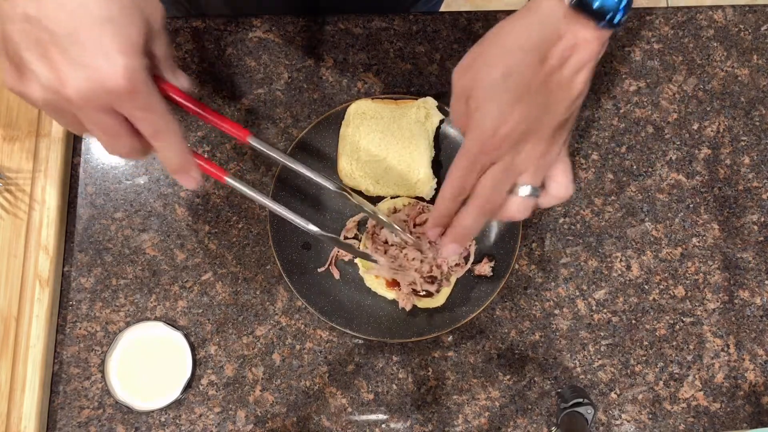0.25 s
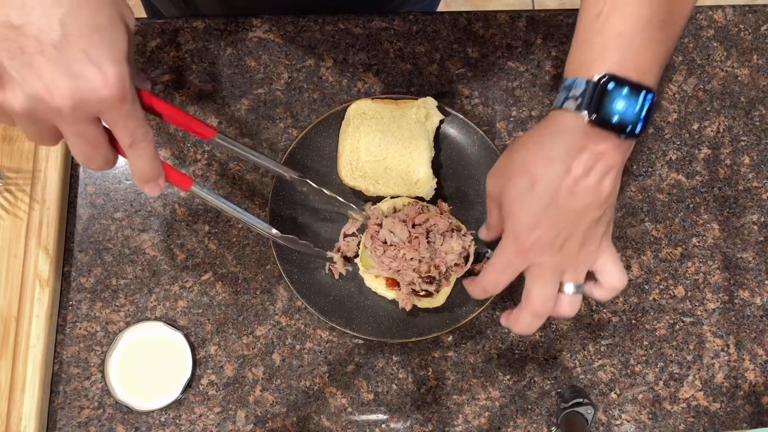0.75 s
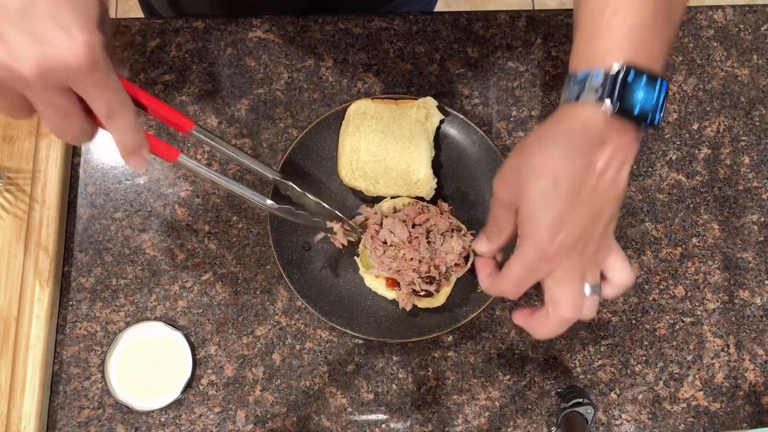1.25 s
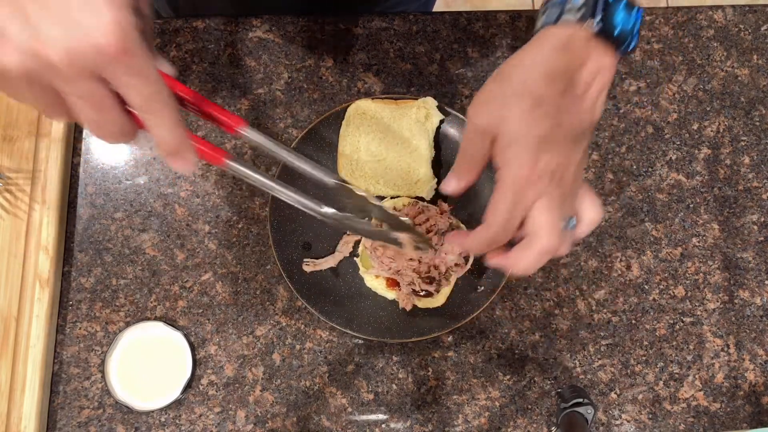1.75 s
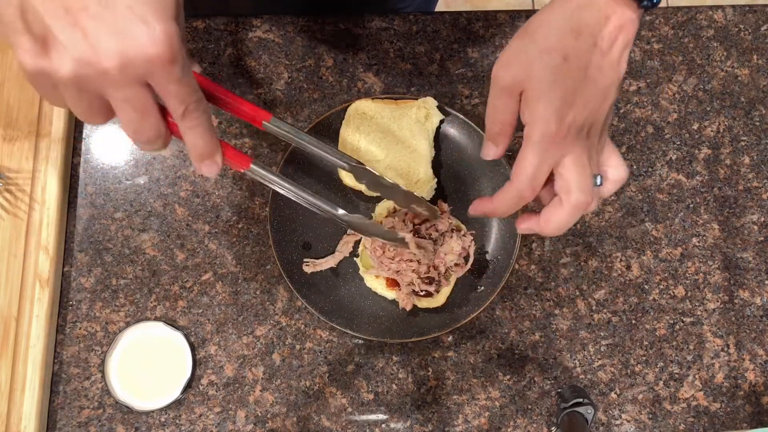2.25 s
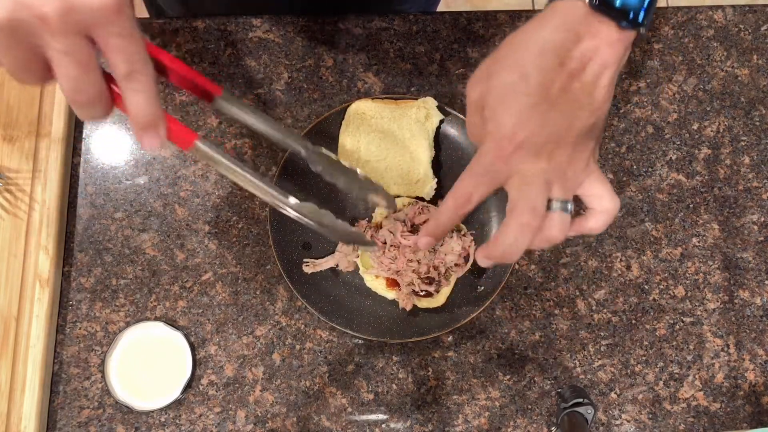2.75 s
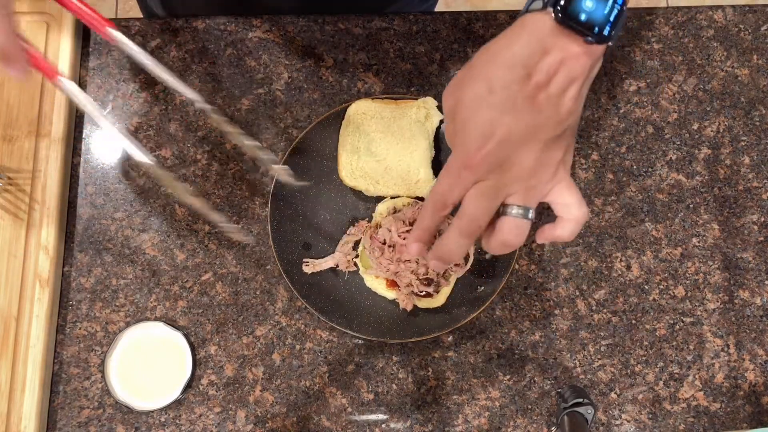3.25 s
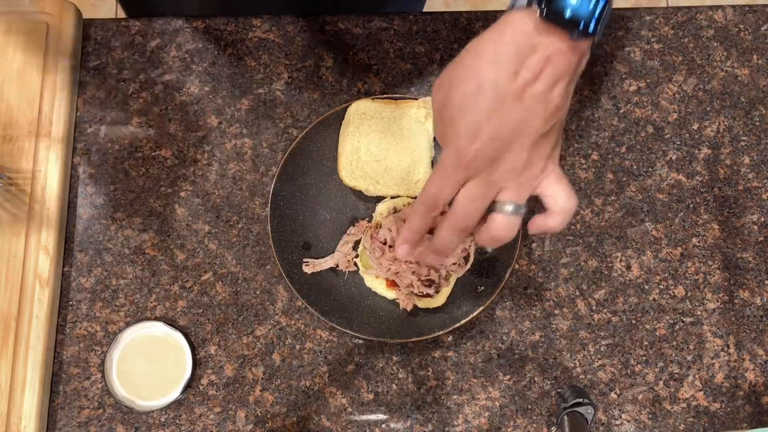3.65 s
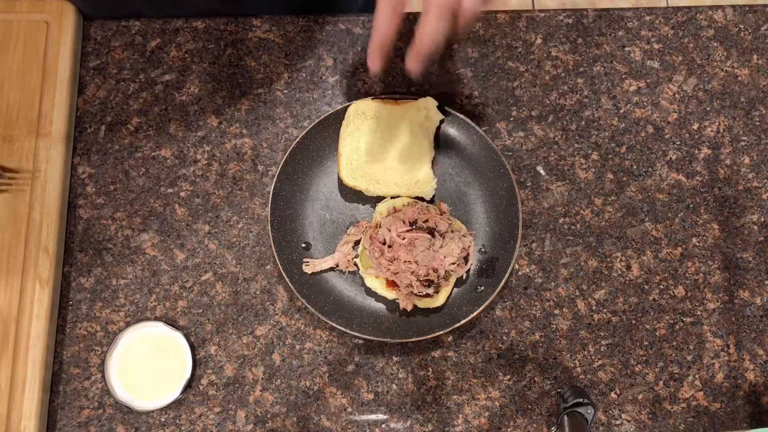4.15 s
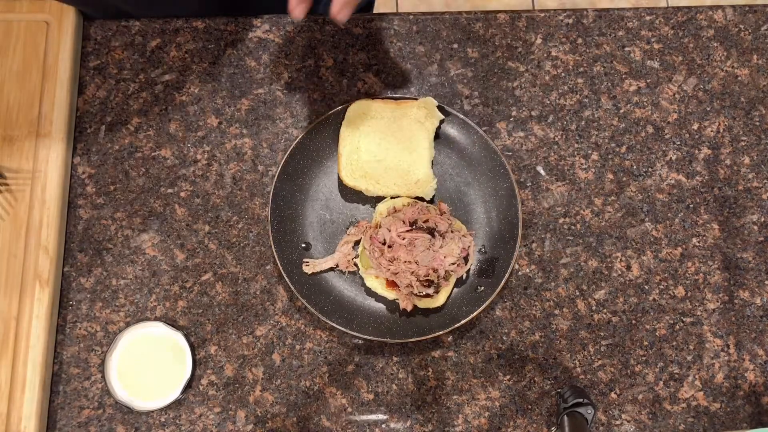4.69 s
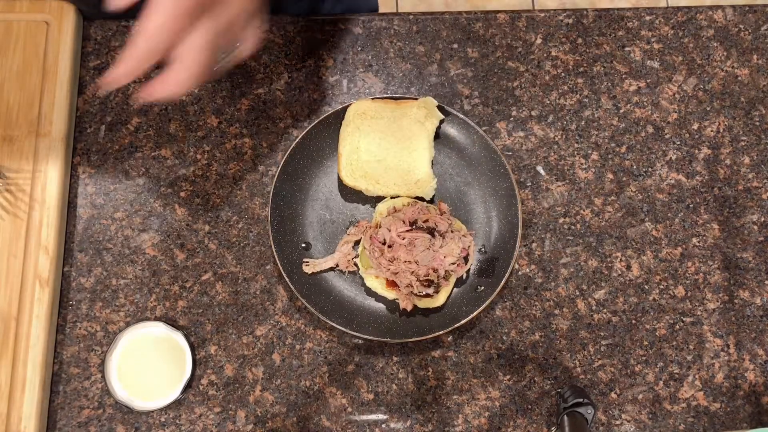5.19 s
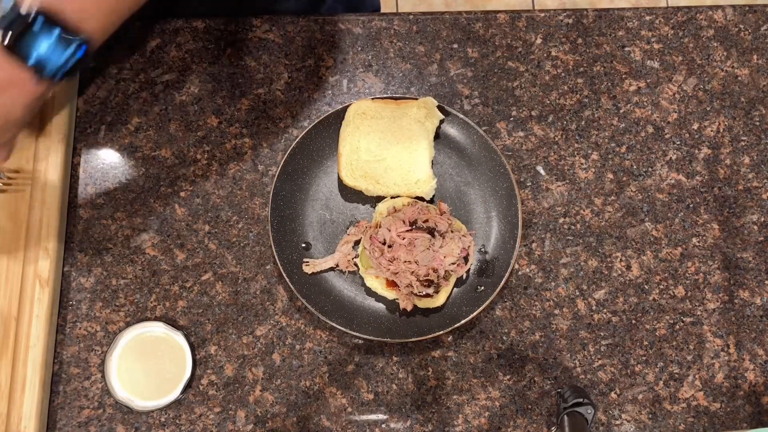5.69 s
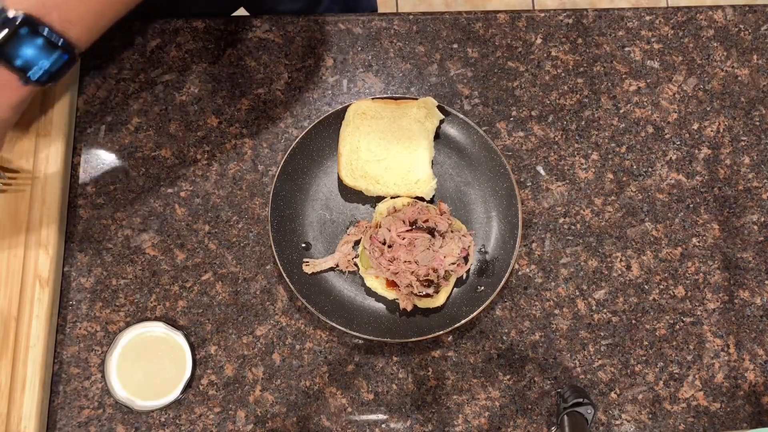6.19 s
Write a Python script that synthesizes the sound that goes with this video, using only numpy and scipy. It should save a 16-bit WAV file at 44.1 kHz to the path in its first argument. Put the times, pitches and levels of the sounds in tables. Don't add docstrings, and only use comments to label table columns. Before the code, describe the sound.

Over a faint fridge hum, tongs pick softly at moist food, then drop with a hard ringing clatter before a run of sharp cutlery clacks.

```python
import sys
import numpy as np
from scipy import signal
from scipy.fft import rfft, irfft, next_fast_len
from scipy.io import wavfile
from scipy.ndimage import uniform_filter1d

SR = 44100
rng = np.random.default_rng(int(sys.argv[2]) if len(sys.argv) > 2 else 0)


def ratio(d):
    e = np.asarray(d, float) / 20
    return 10 ** e


def store_pcm(level_fs):
    pcm = np.round(np.clip(level_fs, -1, 1) * 32767).astype(np.int16)
    wavfile.write(sys.argv[1], SR, np.atleast_2d(pcm).T)


N = 283563

# (time [s], body peak [dB], crack [dB re body], room [dB], far-wall echo [dB])
BLOWS = [
    (4.2450, 2, -6.5, -15, -13),
    (4.512, 7, -9.5, -6.5, -28.5),
    (5.667, -3, -8, -16, -15),
    (5.8679, 3, -7.5, -15.5, -12),
    (6.044, 1, -10, -13.5, -9.5),
    (6.1871, -1, -17, -10, -8),
    (6.3945, -18, -12, -10, -25),
    (2.0445, -23, -11, -5, -20),
]
# (frequency [Hz], width [Hz], level [dB])
TONGS_TIP = [(230, 58, -13), (288, 76, 2), (520, 50, -5.5), (675, 150, 3.5), (1008, 350, 1.5),
             (1375, 170, 2), (1824, 260, -5), (2420, 300, -2), (3166, 445, -11.5), (4500, 500, -12.5),
             (5500, 500, -17.5), (6760, 500, -22.5), (10800, 600, -30), (12600, 500, -28.5)]
TONGS_FALL = [(309, 39, -6.5), (594, 125, -1.5), (910, 250, -6), (1494, 750, -4), (1950, 237, 3),
              (2480, 260, -10.5), (3240, 160, -2), (4280, 500, -16.5), (5800, 320, -10),
              (11900, 700, -37.5), (14700, 500, -38)]
KNOCK_1 = [(1800, 130, 1), (2760, 280, -7.5), (3680, 98, -14.5), (4320, 125, -0.5), (7120, 150, -19),
           (12800, 130, -25), (13700, 260, -31), (14600, 160, -33)]
KNOCK_2 = [(1153, 250, 3), (1846, 180, 10.5), (2820, 150, 7.5), (3840, 48, -3), (4310, 120, 7.5),
           (6100, 110, -10), (6860, 290, -4.5), (7900, 98, -9), (8770, 91, -24), (10500, 110, -24),
           (14800, 130, -24)]
KNOCK_3 = [(1818, 97, 3), (2590, 250, -4.5), (3235, 100, -8.5), (4050, 90, -6), (4650, 160, -3),
           (5670, 85, -23), (7080, 170, -15), (8080, 140, -14.5), (11500, 280, -25), (12700, 260, -25),
           (14000, 130, -16)]
KNOCK_4 = [(1723, 150, -5.5), (2350, 250, -12.5), (2904, 240, -7.5), (3960, 145, -0.5), (5150, 100, -28),
           (5900, 150, -10), (6680, 57, 5.5), (9000, 200, -17), (9900, 200, -30), (11100, 160, -15),
           (13500, 400, -19), (14700, 200, -20.5)]
LAST_TAP = [(2130, 330, 2), (2620, 200, 2), (3860, 270, 0), (4500, 210, -2), (6050, 250, -9),
            (6620, 230, -5), (7570, 220, -15), (8800, 280, -14), (10800, 600, -20), (12600, 300, -20)]
FAR_CLACK = [(1650, 200, 0), (2050, 250, -3), (2600, 300, -5), (3200, 400, -4), (3700, 400, -3),
             (4250, 400, -6)]
TONGS_CRACK_HZ, CUTLERY_CRACK_HZ, CRACK_ROOM_DB = 2600, 4600, 6.5
ECHO_S = .0295

# (frequency [Hz], level [dB], t60 [s])
KNOCK_1_RING = [(1061, -6, .15), (1507, -8, .16), (1690, -5, .2), (1820, -7, .35), (2589, 0, .3),
                (3585, -5, .4), (4253, -10, .2), (4640, -10, .35), (5303, -11, .16), (6019, -17, .3),
                (7101, -20, .15), (7827, -23, .2), (8172, -26, .25), (8850, -25, .2)]
KNOCK_2_RING = [(937, -14, .3), (1114, -5, .12), (1529, -10, .25), (1690, -9, .35), (1814, -3, .22),
                (2590, -6, .3), (2708, -10, .25), (3338, -13, .17), (3849, -9, .16), (4242, -14, .25),
                (4716, -14, .3), (6002, -22, .35), (7246, -20, .14), (7983, -25, .25)]
KNOCK_3_RING = [(937, -4, .1), (1497, -13, .4), (1800, -6, .3), (1900, -2, .27), (2503, -10, .4),
                (3338, -8, .17), (4247, -13, .28), (4678, -6, .26), (4743, -9, .3), (2805, -14, .15),
                (5114, -16, .22), (5609, -21, .3), (7041, -16, .05), (8495, -26, .2)]
SPOON_RING = [(1770, -5, .2), (1534, -18, .4), (3000, -15, .2), (3990, -15, .3), (5329, -24, .1),
              (5992, -18, .13), (6659, 0, .11), (6648, -21, 1.1), (8732, -30, .3), (11380, -13, .26)]
LAST_TAP_RING = [(1800, -4.5, 0.17), (2800, -4, 0.054), (3850, -3.5, 0.083), (4530, -7, 0.1),
                 (6630, -3, .05), (8700, -16, .04)]
TONGS_FALL_RING = [(522, -2, .4), (615, -5, .35), (714, -4.5, .4), (800, -6, .4), (883, -3, .45),
                   (1357, -2.5, .13), (1830, -4, 0.55), (2008, -4.5, .6), (1905, -7, .5), (2579, -7, 0.45),
                   (2750, -10, .4), (3268, -9, .3), (4253, -15, .35)]
TONGS_TIP_RING = [(614, 0, 0.23), (727, -8, 0.74), (1287, -20, 5.0), (1717, -17, 5.0), (1809, -16, 3.9),
                  (2137, -12, 1.0), (2229, -11, 0.52), (2541, -17, 1.1), (3343, -14, 0.42),
                  (3521, -22, 0.84), (4317, -14, 0.23), (4990, -33, 1.4), (5281, -21, 0.4),
                  (5949, -35, 5.0)]
# (time [s], peak [dB])
RING_HITS = [
    (5.668, -21.5),
    (5.868, -20),
    (6.043, -22),
    (6.188, -25),
    (6.394, -31),
    (4.513, -17.5),
    (4.246, -20),
]
BEAT_DEPTH, BEAT_HZ = .35, 30

# (frequency [Hz], level [dB], t60 [s])
PLATE = [(1410, -20, .05), (1879, 0, .075), (2148, 0, .06), (3106, -18, .5), (3450, -12, .025),
         (4160, -10, .09), (5286, -18, .12), (6546, -18, .1), (9400, -20, .04), (12000, -22, .05)]
RIM = [(1879, 0, .035), (2148, -5, .03), (3106, -16, .2), (4160, -14, .08), (9000, -16, .04),
       (11800, -20, .1)]
BOWL = [(1150, 0, .05), (1850, -4, .05), (3000, -10, .04)]
SPRING = [(5700, -10, .05), (6900, -6, .05), (11060, -9, .045), (14010, 0, .06), (14360, -6, .06)]
HINGE = [(7050, -0.5, .08), (11400, 0, .08), (5300, -7, .06)]
# (time [s], peak [dB])
PLATE_HIT = (.680, -27.5)
BOWL_HIT = (.898, -37)
# (time [s], peak [dB])
RIM_HITS = [
    (.758, -36),
    (.766, -36),
    (.783, -34),
    (.872, -40),
    (1.544, -45),
]
SPRING_HITS = [
    (4.432, -54),
    (4.455, -38.5),
    (4.475, -46),
]
HINGE_HITS = [
    (4.31, -48.5),
    (4.337, -42),
]

# (time [s], level [dB], centre [Hz], room [dB], length [cycles])
THUMPS = [(1.817, -36.5, 330, -5, 3), (1.833, -38.5, 99, -6, 10.5), (1.851, -43, 24, -15, 5),
          (4.089, -40.5, 110, -16.5, 2.8), (4.514, -27.5, 130, -2.5, 2.6), (5.669, -25.5, 1030, -11, 6.2),
          (5.683, -33, 1060, -10, 14), (5.668, -36.5, 270, -2.5, 2.3), (5.872, -32.5, 340, -7, 3),
          (6.047, -29, 1130, -8.5, 9.6), (6.048, -39.5, 350, -1, 3), (6.262, -28.5, 275, -11, 5.5),
          (6.258, -26, 760, -4, 1.8), (2.047, -35.5, 1150, -0.5, 2.2), (.768, -42, 480, -6, 4),
          (4.277, -27, 2100, -8, 9), (4.318, -30, 2000, -8, 12), (4.33, -33, 3200, -8, 20),
          (6.268, -40, 2500, -8, 9)]
THUMP_OCTAVES = 2.04
# (time [s], level [dB], centre [Hz], room [dB], width [octaves])
SNAPS = [
    (4.182, -35, 5500, 6, 3),
    (4.2455, -14.5, 1005, -1, 3.3),
    (4.246, -21, 12100, 0, 1.1),
    (4.5125, -21, 2400, 11, 3.2),
    (4.529, -20, 2000, 4, 3.9),
    (5.6675, -24, 1800, 4, 3.5),
    (6.2585, -26, 1100, -4, 1.5),
]
# (time [s], level [dB], centre [Hz], room [dB], width [octaves])
FAR_KNOCKS = [
    (.383, -42.5, 730, -4, 1.2),
    (.763, -46, 1100, -3, 2.6),
    (.897, -42, 1260, -5, 2),
    (2.343, -42, 950, 2.5, 2.85),
]
# (time [s], level [dB], centre [Hz], room [dB])
CHIRPS = [
    (.855, -54, 3750, -5),
    (3.445, -51, 2700, 2),
    (3.475, -53, 2750, -3),
    (3.5, -54, 2550, -6),
]
SNAP_S, FAR_S, CHIRP_S, CHIRP_OCTAVES = .0007, .011, .018, .33

# (time [s], peak [dB], centre [Hz])
FOOD_TICKS = [(.035, -35.5, 7450), (.057, -34, 2160), (.061, -40, 9500), (0.0753, -26, 5660),
              (0.077, -32.5, 11000), (.1222, -31, 7400), (.144, -39, 3000), (.151, -37, 5000),
              (.202, -38, 5960), (1.423, -37, 9000), (1.44, -39, 11500), (1.78, -27, 10500),
              (1.84, -37, 9000), (2.333, -42, 4000), (2.929, -37, 11100), (2.941, -37, 10000),
              (2.991, -30, 7600), (3.021, -37.5, 5800), (3.058, -32.5, 2620), (3.0605, -37.5, 9000),
              (3.080, -37.5, 11000), (3.134, -36.5, 5500), (3.2596, -35, 13000), (3.291, -34, 6400),
              (3.3547, -26.5, 2500), (3.3558, -29, 7160), (3.365, -33, 9000), (3.46, -33, 6500),
              (3.567, -39, 2600), (3.606, -38, 9500)]
# (time [s], peak
# [dB], centre [Hz])
STEEL_TICKS = [(4.256, -26, 6500), (4.278, -30, 7000), (4.312, -31, 7500), (4.326, -32, 8000),
               (4.338, -24, 8500), (4.53, -30, 11000), (4.542, -33, 12000), (5.568, -28.5, 12500),
               (5.568, -30.5, 3960), (5.635, -28, 7440), (5.653, -40, 9000)]
FOOD_OCTAVES, STEEL_OCTAVES = 1.2, 1.8
# (start [s], length [s], peak [dB])
SQUEEZES = [
    (.02, 0.21, -43),
    (2.95, 0.24, -40.5),
    (3.263, .05, -38.5),
]
CRACKLE_PER_S, CRACKLE_HZ, CRACKLE_SPREAD = 36, 10500, .4

# (start [s], length [s], top level [dB], first centre [Hz], last centre [Hz])
SLIDES = [
    (.74, .4, -54.5, 1600, 800),
    (2.599, 0.32, -47.5, 520, 700),
    (3.4, .2, -54, 700, 2600),
    (3.751, 0.49, -54, 680, 860),
    (4.18, .055, -48, 4500, 4000),
    (4.18, .04, -49, 1600, 1500),
    (4.244, 0.13, -44, 9000, 2800),
    (4.359, 0.1, -47, 2600, 1600),
    (4.456, 0.066, -38, 1000, 700),
]
SLIDE_RISE, SLIDE_FALL, SLIDE_EDGE_DB = .2, .35, -9

# (frequency [Hz], level [dB per Hz])
AIR = [(12, -40), (20, -10.5), (84, -5), (224, -6.5), (599, -16), (794, -15.5), (863, -19.5), (4050, -30.5),
       (4410, -30), (5670, -30), (8410, -34), (15200, -39.5), (16500, -49.5)]
AIR_DB = -47
# (frequency [Hz], width [Hz], level [dB over the air])
WHISTLES = [(27, 8, -4.5), (198.6, 8.1, 11), (217.9, 9.9, 8), (332.2, 10, 6.5), (453, 29, 5), (1245, 43, 3),
            (1610, 39, 5), (1834, 20, 8.5), (3510, 230, 5.5), (4050, 89, 7.5), (5210, 380, 4.5),
            (5720, 200, 10.5), (7160, 190, 5.5), (7650, 740, 6), (9950, 1100, 7), (12000, 260, 5),
            (14300, 970, 7.5), (15600, 420, 15)]
# (frequency [Hz], rms [dB], wobble [dB])
HUM = [
    (58.4, -48, -1),
    (100.5, -48, 1.5),
]

# (frequency [Hz], t60 [s])
ROOM_T60 = [(100, 0.31), (300, 0.51), (800, 0.72), (2000, .68), (4000, 0.6), (7000, 0.36), (12000, .3)]
# (frequency [Hz], level [dB])
ROOM_COLOUR = [(60, 0.5), (300, 2), (1000, .6), (2800, -4.5), (6000, -7.5), (14000, -8.5)]
CLOSE_ROOM_DB, ASIDE_ROOM_DB = -12, -4

GAIN_DB, DIP_DB, CUT_DB = -1.12, -5, -6
GAIN_ATTACK_S, DIP_S, CREEP_DB_PER_S = .045, .16, 1.1
TOP_HZ, TOP_DB, CEILING = 15780, -22, .8


def along(points, x, log=False):
    a, b = np.transpose(points)
    if log:
        return np.interp(np.log(x + 1), np.log(a + 1), b)
    return np.interp(x, a, b)


def add(out, s, piece):
    i = int(s * SR)
    out[i:i + len(piece)] += piece[:N - i]


def shaped(x, gain):
    size = next_fast_len(len(x), True)
    hz = np.arange(size // 2 + 1) * SR / size
    return irfft(rfft(x, size) * gain(hz), size)[:len(x)]


def bell(hz, octaves):
    return lambda f: np.exp(-2 * (np.log2((f + 1) / hz) / octaves) ** 2)


def peak(x, db):
    return x * ratio(db) / np.abs(x).max()


def like(x, other):
    return x * np.sqrt(np.sum(other ** 2) / np.sum(x ** 2))


def walk(rate):
    k = int(SR / rate)
    w = np.repeat(rng.standard_normal(N // k + 1), k)
    w = uniform_filter1d(uniform_filter1d(w, k), k)[:N]
    return w / w.std()


def ring(modes, scatter_db, size=18000, beat=0):
    hz, db, t60 = np.transpose(modes)[:, :, None]
    t = np.arange(size) / SR
    level_chance, twin_chance = rng.standard_normal((2, len(modes), 1))
    waves = np.sin(2 * np.pi * hz * t)
    waves = waves + beat * np.sin(2 * np.pi * (hz + BEAT_HZ * twin_chance) * t)
    sense = (-1) ** np.arange(len(modes))[:, None]
    decay = ratio(db + scatter_db * level_chance - 60 * t / t60)
    return np.sum(sense * decay * waves, axis=0)


def blows():
    near, feed, spread = np.zeros((3, N))
    t = np.arange(2000) / SR
    bodies = TONGS_TIP, TONGS_FALL, KNOCK_1, KNOCK_2, KNOCK_3, KNOCK_4, LAST_TAP, FAR_CLACK
    for (s, db, crack_db, room_db, echo_db), body in zip(BLOWS, bodies):
        is_tongs = body in (TONGS_TIP, TONGS_FALL, FAR_CLACK)
        crack_hz = TONGS_CRACK_HZ if is_tongs else CUTLERY_CRACK_HZ
        modes = [(hz, top_db + 20 * np.log10(width), np.log(1000) / np.pi / width)
                 for hz, width, top_db in body]
        body_ring = peak(ring(modes, 0, size=2000), db)
        crack = shaped(rng.standard_normal(len(t)), bell(crack_hz, 2.48)) * np.exp(-t / .0024)
        crack = peak(crack, db + crack_db)
        blow = (body_ring + crack) * (1 - np.exp(-t / .0004))
        add(near, s, blow)
        echo = shaped(blow * (1 - np.exp(-t / .0012)), bell(3500, 1.4))
        add(near, s + ECHO_S, echo * ratio(echo_db + 4))
        add(feed, s, body_ring * ratio(room_db))
        impulse = 1. * (np.arange(256) == 32)
        even = shaped(impulse, bell(.7 * crack_hz, 2.1))
        add(spread, s, like(even, crack) * ratio(room_db + CRACK_ROOM_DB))
    return near, feed, spread


def rings():
    aside, close = np.zeros((2, N))
    steel = (KNOCK_1_RING, KNOCK_2_RING, KNOCK_3_RING, SPOON_RING, LAST_TAP_RING,
             TONGS_FALL_RING, TONGS_TIP_RING)
    for modes, (s, db) in zip(steel, RING_HITS):
        add(aside, s, peak(ring(modes, 0, beat=BEAT_DEPTH), db))
    near_things = ((PLATE, [PLATE_HIT]), (RIM, RIM_HITS), (BOWL, [BOWL_HIT]),
                   (SPRING, SPRING_HITS), (HINGE, HINGE_HITS))
    for modes, hits in near_things:
        for s, db in hits:
            add(close, s, peak(ring(modes, .73), db))
    return aside, close


def knocks():
    near, feed = np.zeros((2, N))
    t = np.arange(16384) / SR
    rows = [(s, db, hz, room_db, THUMP_OCTAVES / np.sqrt(cycles), cycles / hz)
            for s, db, hz, room_db, cycles in THUMPS]
    rows += [(*r, SNAP_S) for r in SNAPS]
    rows += [(*r, FAR_S) for r in FAR_KNOCKS]
    rows += [(*r, CHIRP_OCTAVES, CHIRP_S) for r in CHIRPS]
    for s, db, hz, room_db, octaves, length in rows:
        push = rng.standard_normal(len(t)) * np.exp(-t / length)
        push[0] = np.sqrt(.5 * length * SR + 40)
        edges = np.clip(hz * 2 ** (np.array([-.5, .5]) * octaves), 10, .45 * SR)
        band = signal.butter(2, edges, "bandpass", fs=SR, output="sos")
        burst, jolt = signal.sosfilt(band, [push, t == 0])
        burst = burst * ratio(db) / np.sqrt(np.sum(burst ** 2) / (length * SR))
        add(near, s, burst)
        add(feed, s, like(jolt, burst) * ratio(room_db))
    return near, feed


def ticks():
    out = np.zeros(N)
    t = np.arange(512) / SR
    rows = [(*r, FOOD_OCTAVES) for r in FOOD_TICKS] + [(*r, STEEL_OCTAVES) for r in STEEL_TICKS]
    for start, length, db in SQUEEZES:
        for u, a, b in rng.random((int(length * CRACKLE_PER_S) + 1, 3)):
            hz = CRACKLE_HZ * 2 ** (CRACKLE_SPREAD * (2 * b - 1))
            rows.append((start + u * length, db + 8 * (a - .5), hz, FOOD_OCTAVES))
    for s, db, hz, octaves in rows:
        click = shaped(rng.standard_normal(len(t)), bell(hz, octaves)) * t * np.exp(-t / .00059)
        add(out, s - .0004, peak(click, db))
    return out


def slides():
    out = np.zeros(N)
    for s, length, db, first_hz, last_hz in SLIDES:
        u = np.arange(0, 1, 1 / (length * SR))
        centre = first_hz * (last_hz / first_hz) ** u
        rub = 0
        for band_hz in 250 * 2 ** np.arange(0, 6.1, .5):
            band = shaped(rng.standard_normal(SR // 2), bell(band_hz, 1.0))[:len(u)]
            rub = rub + band / band.std() * bell(centre, 2.2)(band_hz)
        edge = np.maximum(1 - np.minimum(u / SLIDE_RISE, (1 - u) / SLIDE_FALL), 0)
        level_db = db + SLIDE_EDGE_DB * edge + walk(40)[:len(u)]
        add(out, s, rub / 1.45 * ratio(level_db))
    return out


def room():
    t = np.arange(SR) / SR
    out = 0
    for hz in 50 * 2 ** np.arange(0, 8.6, .5):
        band = shaped(rng.standard_normal(SR), bell(hz, .91))
        out = out + band * ratio(along(ROOM_COLOUR, hz, True) - 60 * t / along(ROOM_T60, hz, True))
    out = out * (1 - np.exp(-(t / .0013) ** 2))
    return out / np.sqrt(np.sum(out ** 2))


def appliances():
    base = lambda f: ratio(along(AIR, f, True))
    air = shaped(rng.standard_normal(N), base)
    scale = ratio(AIR_DB) / air.std()
    for hz, width, db in WHISTLES:
        line = lambda f: base(f) * ratio(db) / (1 + (2 * (f - hz) / width) ** 4)
        air = air + shaped(rng.standard_normal(N), line) * ratio(1.3 * walk(4.8))
    hum = 0
    for hz, db, wobble_db in HUM:
        level = np.sqrt(2) * ratio(db + wobble_db * walk(7.3))
        hum = hum + level * np.sin(2 * np.pi * np.cumsum(hz + .5 * walk(3.3)) / SR)
    return scale * air + hum


def scene():
    near, feed, spread = blows()
    aside, close = rings()
    dull, dull_feed = knocks()
    close = close + ticks()
    feed = feed + ratio(ASIDE_ROOM_DB) * aside + ratio(CLOSE_ROOM_DB) * close
    tail = sum(signal.oaconvolve(x, room())[:N] for x in (feed, spread, dull_feed))
    return (near + aside + dull + close + slides() + tail + appliances())[None]


def band_limit(x):
    return signal.sosfilt(signal.butter(12, 16980, fs=SR, output="sos"), x)


def record(dry):
    loudest = max(BLOWS, key=lambda row: row[1])
    since = np.maximum(np.arange(N) / SR - loudest[0], 0)
    duck_db = DIP_DB * np.exp(-since / DIP_S) + CUT_DB + CREEP_DB_PER_S * since
    gain_db = GAIN_DB + np.minimum(since / GAIN_ATTACK_S, 1) * duck_db
    mix = CEILING * np.tanh(dry[0] * ratio(gain_db) / CEILING)
    mix = shaped(mix, lambda f: np.where(f < TOP_HZ, 1, ratio(TOP_DB) * (f < 16900)))
    return band_limit(mix[None])


dry = scene()
out = record(dry)
store_pcm(out)
```